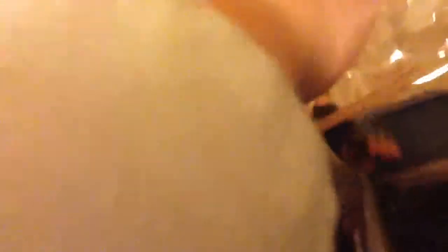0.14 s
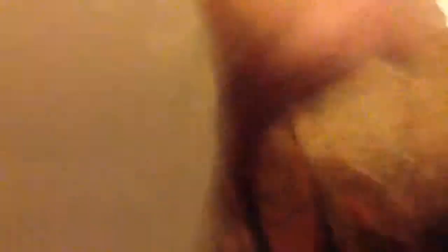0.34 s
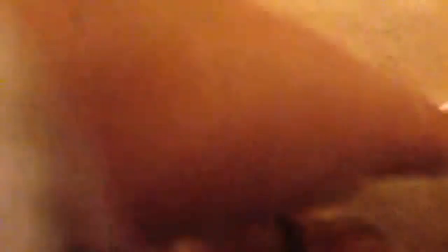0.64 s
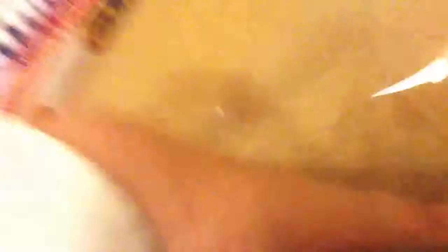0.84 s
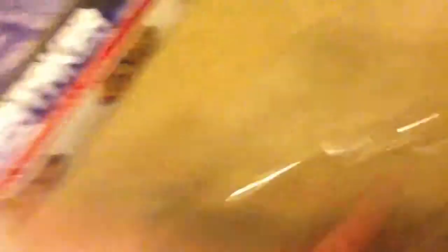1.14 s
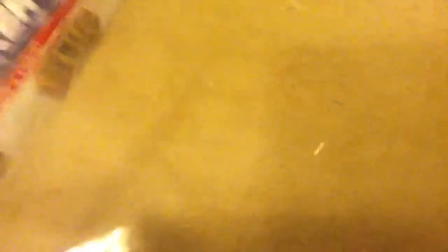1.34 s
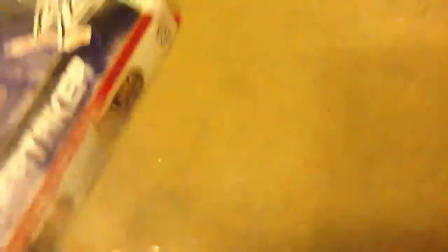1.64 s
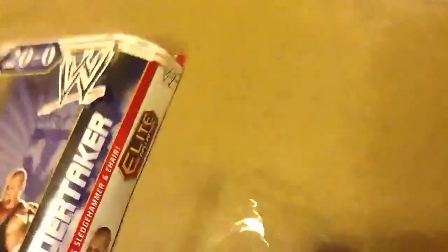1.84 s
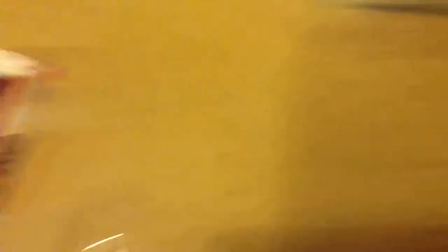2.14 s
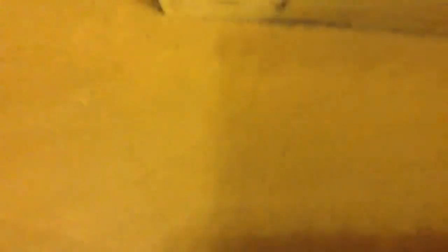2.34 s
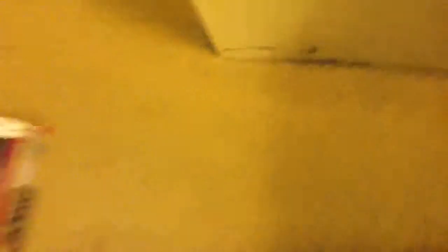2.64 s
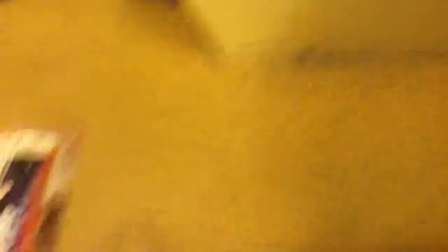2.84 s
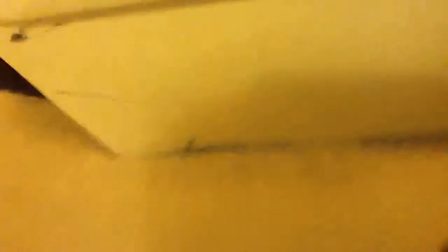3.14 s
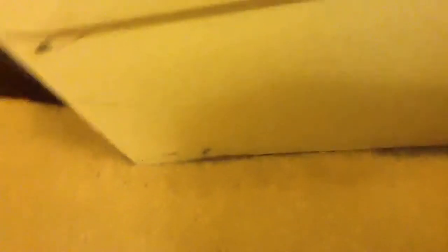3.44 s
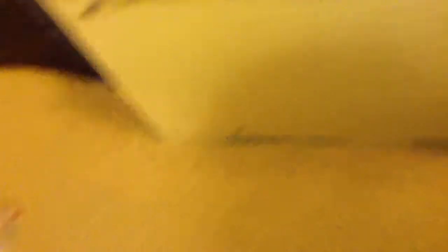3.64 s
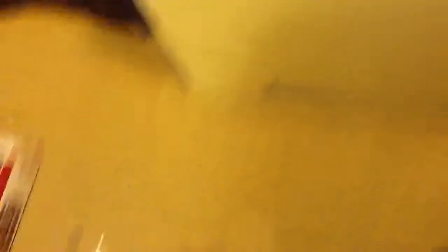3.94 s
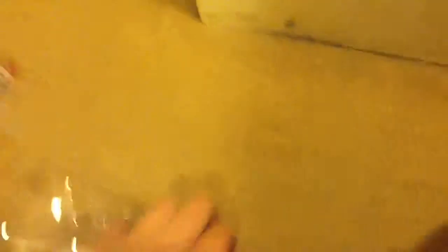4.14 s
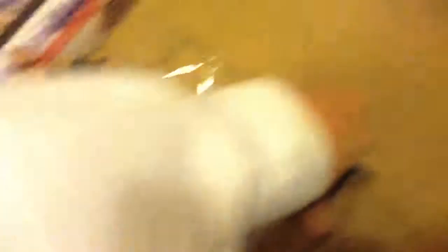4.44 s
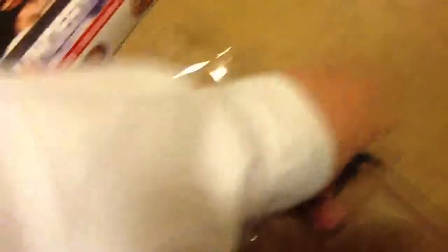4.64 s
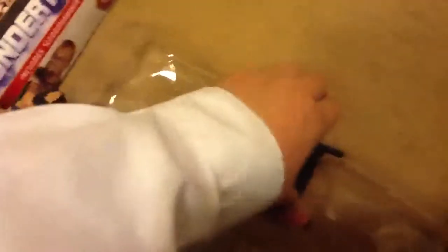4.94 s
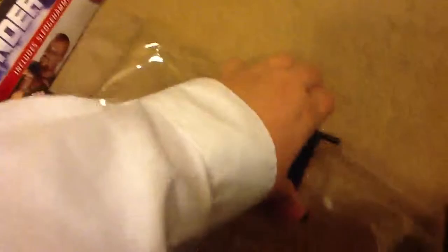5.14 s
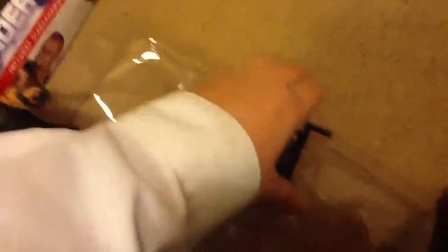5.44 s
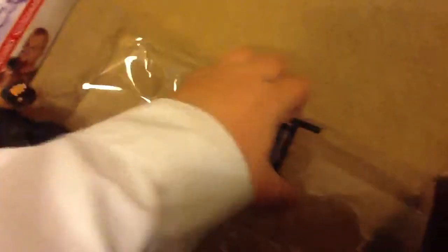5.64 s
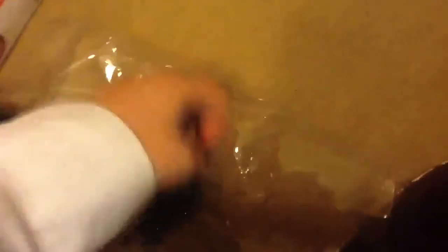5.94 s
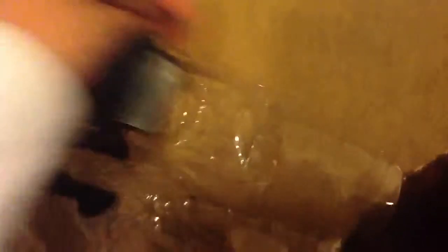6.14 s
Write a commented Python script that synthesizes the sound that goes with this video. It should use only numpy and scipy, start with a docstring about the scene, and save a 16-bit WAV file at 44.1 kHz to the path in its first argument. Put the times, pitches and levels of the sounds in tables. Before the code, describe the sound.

Very close to the microphone in a small carpeted room, hands work a stiff clear plastic pack. Sharp irregular crackles and dry snaps come in clusters, thickest in the first two seconds, with rubbing and small ticks. A near-quiet lull follows, then scattered rustles and pops, and finally deeper, hollow, more resonant snaps before it settles.

```python
"""On a carpet in a small room, a clear plastic blister pack is pulled apart and shifted about, close by.
Strokes of the hands drive filtered stick-slip noise (plastic rubbing on plastic) and random tiny pops and ticks.
Stiff facets buckle with dry snaps: a thump, a short pitched ring and a crack along the crease.
The shell rings on through a bank of modes, more freely once it lies open; low sines make handling bumps.
Sparse reflections answer over a quiet noise floor."""
import sys
import numpy as np
from scipy import signal
from scipy.io import wavfile

SR = 44100
rng = np.random.default_rng(int(sys.argv[2]) if len(sys.argv) > 2 else 0)


def wav_out(sig):
    """Save sig, one row per channel (or a flat mono array), as 16-bit PCM at SR to the path in sys.argv[1]."""
    wavfile.write(sys.argv[1], SR, np.round(np.clip(np.atleast_2d(sig).T, -1, 1) * 32767).astype(np.int16))


N = 277696
TIME = np.arange(N) / SR

# buckling facets: (time [s], facet pitch [Hz], facet ring level [dB], crease crack level [dB])
SNAP_EVENTS = [(0.0069, 1490, -37.5, -46), (0.0588, 874, -32.5, -47), (0.105, 1640, -32.5, -34),
               (0.1182, 1560, -30.5, -38), (0.1406, 1630, -27, -23.5), (0.1935, 1690, -22.5, -21),
               (0.33, 1580, -23.5, -31.5), (0.3357, 900, -21.5, -24), (0.3833, 753, -24, -32),
               (0.3969, 1490, -24, -49), (0.4166, 1110, -28, -36.5), (0.445, 1540, -44, -33.5),
               (0.5475, 760, -25, -42), (0.654, 364, -17, -49.5), (0.796, 880, -23.5, -34),
               (0.8163, 590, -26.5, -49), (0.8433, 857, -19.5, -24.5), (0.8474, 504, -52, -34),
               (0.8595, 1050, -34, -39), (0.9654, 805, -28, -33.5), (1.0055, 420, -31.5, -42),
               (1.09, 602, -34, -35.5), (1.1513, 1060, -27.5, -36), (1.185, 825, -30.5, -50),
               (1.176, 800, -31.5, -43), (1.224, 340, -31, -36), (1.234, 620, -23.5, -31.5),
               (1.2426, 890, -23.5, -38), (1.256, 2080, -29, -37), (1.2722, 570, -24, -27),
               (1.2778, 361, -23, -24), (1.2865, 1386, -29, -27), (1.326, 1180, -20, -32),
               (1.3336, 1050, -41, -40), (1.3503, 1222, -27.5, -45), (1.404, 830, -27.5, -34),
               (1.4299, 660, -29, -36.5), (1.4887, 930, -27, -33), (1.558, 1360, -18.5, -24.5),
               (1.5677, 840, -20.5, -23), (1.6055, 1580, -28, -34), (1.6254, 1920, -20, -22.5),
               (1.6378, 1860, -19, -29), (1.6607, 903, -22.5, -23), (1.673, 1990, -24.5, -19.5),
               (1.703, 1700, -38, -31.5), (1.7426, 1920, -30, -29), (1.7629, 924, -21.5, -19.5),
               (2.0487, 504, -45, -60), (2.375, 554, -41, -51.5), (2.703, 350, -30.5, -37),
               (2.7841, 966, -22, -29), (2.8562, 2180, -36, -38), (2.8713, 980, -30.5, -41),
               (2.907, 1580, -34.5, -34.5), (3.066, 520, -24, -36), (3.103, 1120, -27.5, -45),
               (3.4758, 353, -27, -38), (3.5398, 370, -24.5, -36.5), (3.654, 715, -43, -41.5),
               (3.6733, 510, -27.5, -41.5), (3.8028, 1606, -38.5, -45.5), (3.9517, 1030, -34, -76),
               (4.2634, 1260, -34.5, -46), (4.3647, 550, -38, -47.5), (4.47, 710, -28, -51),
               (4.4962, 608, -21, -30.5), (4.557, 525, -25.5, -34), (4.7397, 930, -49, -42),
               (4.807, 650, -29, -45.5), (4.8307, 640, -31, -39), (4.8531, 1410, -28, -21.5),
               (4.973, 624, -37.5, -42), (5.0618, 755, -34.5, -44), (5.074, 880, -75, -36.5),
               (5.13, 635, -18, -45), (5.179, 1183, -47, -42), (5.1901, 1270, -34.5, -28.5),
               (5.2917, 556, -21, -23), (5.308, 950, -29.5, -35.5), (5.315, 760, -28, -59),
               (5.4087, 790, -35, -59), (5.4514, 710, -43, -42), (5.57, 1730, -33, -31),
               (5.664, 625, -33, -65), (5.745, 1420, -43.5, -37.5), (5.819, 1070, -51, -33),
               (5.8349, 667, -15, -26), (5.845, 580, -13, -41), (5.872, 600, -17, -29),
               (5.8842, 500, -34, -37), (5.9119, 840, -30, -37), (6.025, 580, -26, -34),
               (6.0425, 840, -37, -41)]
# how freely the shell rings: (time [s], level [dB])
SHELL_FREEDOM = [(0, -31), (4.7, -9.5), (4.85, -15.5), (5.3, -21.5), (5.85, -10)]
# spectrum of a snap's thump and of dull flexing: (frequency [Hz], relative level [dB])
THUMP_SPECTRUM = [(20, -37.5), (70, -21), (110, -10.5), (170, 0.5), (260, 6.5), (400, 5.5), (620, -3),
                  (3000, -87)]
# spectrum of rubbing hiss and small ticks: (frequency [Hz], relative level [dB])
HISS_SPECTRUM = [(800, -50.5), (2200, 6.5), (3600, 5.5), (5500, 1.5), (9000, -2), (15000, -7)]


def from_db(db):
    """Decibels to amplitude."""
    return 10 ** (np.asarray(db) / 20)


def unit(x):
    """Scales to energy 1."""
    return x / np.sqrt(np.sum(x ** 2) + 1e-20)


def read(points, hz):
    """Interpolates a table on a log-frequency axis."""
    f, value = np.transpose(points)
    return np.interp(np.log(hz + 1), np.log(f + 1), value)


def read_time(points, time_s):
    """Interpolates a table linearly in time."""
    return np.interp(time_s, *np.transpose(points))


def add(mix, start_s, sound):
    """Adds a sound in place, cut at the end of the mix."""
    part = mix[max(round(start_s * SR), 0):][:len(sound)]
    part += sound[:len(part)]


def lowpass(x, hz):
    """Second-order low-pass."""
    return signal.sosfilt(signal.butter(2, hz, fs=SR, output="sos"), x)


def colour(x, points, tilt_db=0, pivot_hz=1000, size=2048):
    """Minimum-phase filter of the given spectrum, leaned by tilt_db an octave within an octave of the pivot."""
    hz = abs(np.fft.fftfreq(size, 1 / SR))
    lean_db = tilt_db * np.clip(np.log2((hz + 1) / pivot_hz), -1, 1)
    log_gain = np.log(from_db(read(points, hz) + lean_db))
    taps = np.fft.ifft(np.exp(np.conj(signal.hilbert(log_gain)))).real
    return signal.fftconvolve(x, unit(taps))[:len(x)]


def shudder(t, decay_s, scatter, grain):
    """One blow, then a burst of noise with a short soft rise, dying away."""
    noise, size = rng.standard_normal((2, len(t)))
    rise = 1 - np.exp(-t / (0.13 * decay_s))
    burst = noise * rise * np.exp(grain * size - t / decay_s)
    blow = (t == 0) * rng.choice([-1, 1])
    return blow + scatter * unit(burst)


def ring(t, hz, decay_s):
    """One mode of a facet, heard as its velocity, so it carries no deep bass."""
    start = 1 - np.exp(-t * hz * 8)
    return unit(np.gradient(np.sin(2 * np.pi * hz * t) * start * np.exp(-t / decay_s)))


def random_pops(rate_per_s, spread_db, max_spreads):
    """Impulses at random times, their sizes spread exponentially in dB."""
    size = from_db(spread_db * np.minimum(rng.exponential(1, N), max_spreads))
    return size * (rng.random(N) < rate_per_s / SR)


def quiet_floor(level_db=-68):
    """Still room and microphone: steady coloured noise."""
    # (frequency [Hz], relative level [dB])
    floor_spectrum = [(25, -36), (100, -2.5), (270, -5), (1500, -9.5), (15000, -15.5)]
    return from_db(level_db) * colour(rng.standard_normal(N), floor_spectrum)


def room(x, wet_db, count=4):
    """Sparse reflections, each band dying at its own speed; random patterns take turns, so the tail stays even."""
    # (frequency [Hz], t60 [s])
    band_t60 = [(150, 0.078), (500, 0.18), (1500, 0.15), (4000, 0.15), (12000, 0.13)]
    out, after = np.zeros(N), TIME[:SR // 2]
    for k in range(count):
        sparse = rng.standard_normal(len(after)) * (rng.random(len(after)) < 2500 / SR)
        taps = sparse * (after > .005)
        hz, t, z = signal.stft(taps, SR, nperseg=256)
        decay = from_db(-60 * t / read(band_t60, hz)[:, None])
        tail = signal.istft(z * decay, SR, nperseg=256)[1]
        turn = np.sqrt(2 / count) * np.cos(np.pi * (3 * TIME + k / count))  # total power stays constant
        out += signal.fftconvolve(x * turn, unit(tail))[:N]
    return from_db(wet_db) * out


def bumps(decay_s=0.004):
    """Low handling bumps and thumps under some loud snaps: low sines that swell and die."""
    # (time [s], pitch [Hz], envelope peak [dB])
    low_bumps = [(1.238, 146, -23.5), (1.567, 201, -22), (1.635, 185, -23), (3.478, 240, -27.5),
                 (4.558, 260, -25), (5.836, 226, -18.5)]
    t, out = TIME[:SR // 5], np.zeros(N)
    envelope = t / decay_s * np.exp(1 - t / decay_s)
    for start_s, hz, peak_db in low_bumps:
        add(out, start_s, from_db(peak_db) * np.sin(2 * np.pi * hz * t) * envelope)
    return out


def shell(x):
    """The whole pack rings on, as far as the hands let it; no ring outlasts a longest t60."""
    # (frequency [Hz], t60 [s], held to the longest, level [dB])
    shell_modes = [(259.3, 0.93, -20.5), (462, 0.29, -20.5), (620.3, 0.15, -29.5), (770, .13, -30.5),
                   (1880, .12, -39), (2660, 0.15, -19), (3200, 0.14, -11.5), (3700, .18, -41),
                   (4000, 0.28, -18), (7240, .15, -28.5)]
    t, longest_t60_s = TIME[:SR // 2], .36
    response = np.zeros(len(t))
    for hz, t60_s, level_db in shell_modes:
        decay = from_db(-60 * t / min(t60_s, longest_t60_s))
        response += from_db(level_db) * unit(np.sin(2 * np.pi * hz * t) * decay)
    return signal.fftconvolve(x * from_db(read_time(SHELL_FREEDOM, TIME)), response)[:N]


def strokes():
    """Each hand stroke swells, holds and dies away: strength of flexing, scraping and hiss over time."""
    # sheet sliding on sheet: (start [s], length before the fade [s], level [dB], brightness [dB])
    hand_strokes = [(0.0, 0.29, -43, 2.5), (0.303, 0.18, -34, 0.5), (0.49, 0.24, -48.5, 0),
                    (0.765, 0.056, -40, -1.5), (0.998, 0.32, -46.5, 5.5), (1.199, 0.061, -38, 3.5),
                    (1.34, 0.072, -41.5, -6.5), (1.511, 0.18, -35.5, 1), (1.754, 0.14, -44, -0.5),
                    (2.119, 0.14, -60, -7.5), (2.3, 0.095, -58.5, -2), (2.452, 0.087, -60, -7.5),
                    (2.572, 0.44, -52.5, -1.5), (2.757, 0.32, -40.5, 1), (3.036, 0.022, -32.5, -2.5),
                    (3.227, 0.031, -52, -1.5), (3.483, .1, -38, -2.5), (3.637, 0.036, -37, -6),
                    (3.768, 0.2, -44.5, -3), (4.016, 0.14, -46.5, 1.5), (4.221, 0.033, -44, 0),
                    (4.42, 0.29, -43.5, -3), (4.728, 0.49, -51, 2), (5.267, 0.023, -42, 5),
                    (5.378, 0.42, -53, 1), (5.643, 0.041, -44, -3.5), (5.778, 0.15, -40, -4.5),
                    (6.019, 0.031, -48.5, 9), (6.127, 0.52, -60, 7)]
    rise_s, fade_db_per_s = 0.023, 133
    flex_db, flex_db_per_bright_db = -6, -0.65  # dull flexing falls as the stroke brightens
    scrape_db, hiss_db = -1, -9
    waver_db, waver_s = 2.5, .02  # the grip is never steady
    power = np.zeros((3, N))
    for start_s, length_s, level_db, bright_db in hand_strokes:
        rise = np.clip((TIME - start_s) / rise_s, 0, 1)
        fade = from_db(-fade_db_per_s * np.maximum(TIME - start_s - length_s, 0))
        parts_db = [flex_db + flex_db_per_bright_db * bright_db, scrape_db, hiss_db + bright_db]
        power += np.outer(from_db(level_db) * from_db(parts_db), rise * fade) ** 2
    waver = unit(lowpass(rng.standard_normal(N), 1 / (2 * waver_s))) * np.sqrt(N)
    return np.sqrt(power) * from_db(waver_db * waver)


def slips(per_s, spread_db, energy_decay_s):
    """Envelope of tiny stick-slip jerks at random times, each one's energy dying exponentially."""
    jerks = random_pops(per_s, spread_db, max_spreads=3.5)
    energy = signal.lfilter([1], [1, -np.exp(-1 / (energy_decay_s * SR))], jerks ** 2)
    return unit(np.sqrt(energy))


def rubbing(gains):
    """Coarse slips shake the whole sheet, fine ones fizz; under them lies a smooth drag."""
    # (frequency [Hz], relative level [dB])
    scrape_spectrum = [(150, -55), (350, -4), (550, 3), (1200, -4), (2800, -20), (9000, -43)]
    coarse = slips(per_s=230, spread_db=-3.0, energy_decay_s=0.0032)
    fine = slips(per_s=200, spread_db=4.5, energy_decay_s=0.0013)
    out = np.zeros(N)
    spectra = (THUMP_SPECTRUM, scrape_spectrum, HISS_SPECTRUM)
    for gain, spectrum, fineness in zip(gains, spectra, (.3, .5, 1.1)):
        a, b, c = rng.standard_normal((3, N))
        drive = unit(a * coarse) + fineness * unit(b * fine) + 0.66 * unit(c)
        out += colour(unit(drive) * np.sqrt(N) * gain, spectrum)
    return out


def flexing_pops(flex, per_s=30, level_db=-2, spread_db=3.0, count=12):
    """As the sheet bends, its larger panels give with soft, low pops."""
    t, out = TIME[:SR // 25], np.zeros(N)
    for hz in np.geomspace(240, 750, count):
        size = random_pops(per_s / count, spread_db, max_spreads=2.5)
        pop = lowpass(ring(t, hz, decay_s=0.0089), 2 * hz)
        out += signal.oaconvolve(size, pop)[:N]
    return flex * from_db(level_db) * unit(out) * np.sqrt(N)


def crease_ticks(hiss, per_s=48, level_db=-2, spread_db=9.5, count=12):
    """In a bright stroke small creases give way one by one, with thin, sharp ticks."""
    t, out = TIME[:SR // 50], np.zeros(N)
    gentle = np.minimum(hiss / from_db(-45.5), 1)  # weakens the ticks further where the hiss is faint
    for _ in range(count):
        size = random_pops(per_s / count, spread_db, max_spreads=2.5)
        tick = unit(colour(shudder(t, decay_s=0.00067, scatter=2.0, grain=0.31), HISS_SPECTRUM))
        note = ring(t, rng.uniform(1200, 2200), decay_s=0.0075)
        out += signal.oaconvolve(size, tick + 2.4 * note)[:N]
    return hiss * gentle * from_db(level_db) * unit(out) * np.sqrt(N)


def crinkles(scrape, per_s=80, level_db=-2, spread_db=7.5, count=40):
    """While the sheet scrapes hard, tiny facets pop at random, each with its own pitch and a tick."""
    t, out = TIME[:SR // 50], np.zeros(N)
    gentle = np.minimum(scrape / from_db(-45.5), 1)  # a light touch hardly buckles anything
    for hz in np.geomspace(600, 3000, count):
        size = random_pops(per_s / count, spread_db, max_spreads=3)
        tick = unit(colour(shudder(t, decay_s=0.0025, scatter=2.9, grain=0.55), HISS_SPECTRUM))
        note = ring(t, hz, decay_s=.002) * (1000 / hz) ** 1.3
        out += signal.oaconvolve(size, note + 0.16 * tick)[:N]
    return scrape * gentle * from_db(level_db) * unit(out) * np.sqrt(N)


def aftersnaps(scrape, delay_s=.011, level_db=-11, spread_db=3, count=3):
    """In a hard crumple each buckle loads its neighbours, and a few give way just after it."""
    t, out = TIME[:SR // 50], np.zeros(N)
    load = np.minimum(scrape / from_db(-40.5), 1) ** 2  # a slack sheet has none
    for start_s, hz, _, crack_db in SNAP_EVENTS:
        load_now = load[min(max(round(start_s * SR), 0), N - 1)]
        for wait, size in zip(rng.exponential(1, count), rng.standard_normal(count)):
            tick = unit(colour(shudder(t, decay_s=0.0007, scatter=1.6, grain=.3), HISS_SPECTRUM))
            note = ring(t, hz * rng.uniform(1, 2), decay_s=0.0061)
            # levels are rms over a hundredth of a second
            gain = from_db(crack_db + level_db + spread_db * size) * np.sqrt(SR / 100)
            add(out, start_s + delay_s * wait, gain * load_now * unit(tick + 1.1 * note))
    return out


def snaps(size=2600):
    """Each facet flips over: a thump of air, a short ring at its own pitch, and a crack along the crease."""
    # parts of a snap: (frequency [Hz], relative level [dB])
    facet_spectrum = [(100, -49), (280, -21.5), (450, 1.5), (800, -4), (1350, -4.5), (2000, -14),
                      (9000, -76)]
    crack_spectrum = [(300, -33), (1000, 3), (1700, 2), (2600, 3), (4200, -4), (6000, -15.5), (14000, -75)]
    fizz_spectrum = [(1000, -9.5), (3500, -4), (5500, -2), (8500, -2), (10000, -3.5), (12000, -4.5),
                     (15000, -13.5)]
    # top treble against the crack: (time [s], level [dB])
    top_treble = [(0.1, 1), (0.2, -7.5), (0.41, -16), (0.45, -7), (0.82, -3.5), (0.96, -22.5), (1.08, 2),
                  (1.27, 0.5), (1.65, -4.5), (2.8, -18), (3.07, -1), (3.6, -1.5), (4.5, -13.5),
                  (4.72, -1.5), (5.19, -8), (5.29, 7), (5.57, -10.5), (5.83, 2), (6.02, -13.5)]
    thump_re_ring_db = -11.5
    ring_800_hz_s, ring_shrink = .0042, 0.37  # higher facets die sooner, by this power of the pitch
    lean_db, note_share = 4.5, 1.2  # a small facet leans upward (dB an octave, per octave of pitch)
    t, out = np.arange(size) / SR, np.zeros(N)
    for start_s, hz, ring_db, crack_db in SNAP_EVENTS:
        octaves = np.log2(hz / 800)
        thump_db = ring_db + thump_re_ring_db
        fizz_db = crack_db + read_time(top_treble, start_s)
        thump = unit(colour(shudder(t, decay_s=0.017, scatter=1.0, grain=0.53), THUMP_SPECTRUM))

        note = ring(t, hz, decay_s=ring_800_hz_s * 2 ** (-ring_shrink * octaves))
        note = lowpass(note, 2 * hz)  # a large facet starts softly
        body = shudder(t, decay_s=0.006, scatter=1.26, grain=0.11)
        body = unit(colour(body, facet_spectrum, lean_db * octaves))
        facet = unit(body + note_share * note)

        # a quick flip is bright all the way up, a slow one dull
        crack_tilt_db = 0.68 * (fizz_db - ring_db + 12.5)
        fizz_tilt_db = .4 * (fizz_db - crack_db - 3)
        crack = shudder(t, decay_s=0.0025, scatter=3.4, grain=0.5)
        crack = unit(colour(crack, crack_spectrum, crack_tilt_db, pivot_hz=2500))
        overtone = ring(t, max(hz, rng.uniform(1540, 3600)), decay_s=0.0041)
        crack = unit(crack + 0.28 * overtone)
        fizz = shudder(t, decay_s=0.0021, scatter=2.2, grain=0.3)
        fizz = unit(colour(fizz, fizz_spectrum, fizz_tilt_db, pivot_hz=8500))

        snap = from_db(thump_db) * thump + from_db(ring_db) * facet
        snap += from_db(crack_db) * crack + from_db(fizz_db) * fizz
        add(out, start_s, snap * np.sqrt(SR / 100))  # levels are rms over a hundredth of a second
    return out


def scene():
    """Snaps, small crinkles, ticks, pops and rubbing, the shell's ring, bumps, the room and its quiet floor."""
    flex, scrape, hiss = strokes()
    plastic = snaps() + crinkles(scrape) + crease_ticks(hiss) + flexing_pops(flex)
    plastic = plastic + rubbing((flex, scrape, hiss)) + aftersnaps(scrape)
    plastic = plastic + shell(plastic) + bumps()
    # the open pack radiates more into the room
    spill = from_db(0.53 * read_time(SHELL_FREEDOM, TIME))
    return (plastic + room(plastic * spill, wet_db=-5) + quiet_floor())[None]


def record(dry):
    """A fast limiter holds the tallest peaks and ducks their tails; then the bass cut and the band limit."""
    ceiling_db, recovery_db_per_s, low_cut_hz, edge_hz = -3, 70, 75, 15650
    fall_db = TIME * recovery_db_per_s
    peak_db = 20 * np.log10(abs(dry[0]) + 1e-9)
    held_db = np.maximum.accumulate(peak_db + fall_db) - fall_db
    limited = dry / from_db(np.maximum(held_db - ceiling_db, 0))
    thin = signal.sosfilt(signal.butter(2, low_cut_hz, "high", fs=SR, output="sos"), limited)
    band_limit = signal.firwin(255, edge_hz, window=("kaiser", 9), fs=SR)
    return signal.oaconvolve(thin, band_limit[None], "same")


dry = scene()
out = record(dry)
wav_out(out)
```